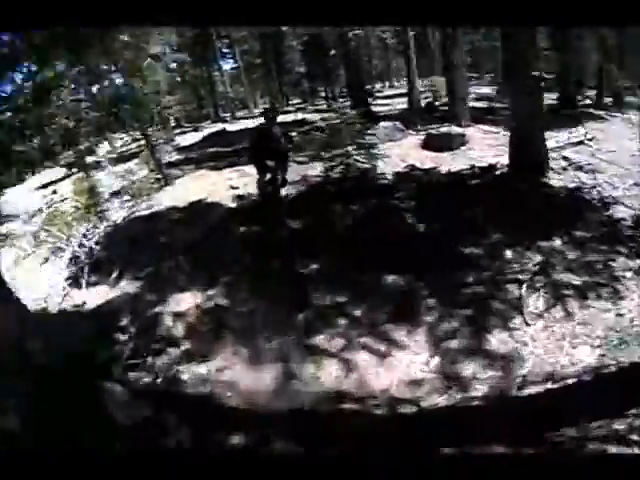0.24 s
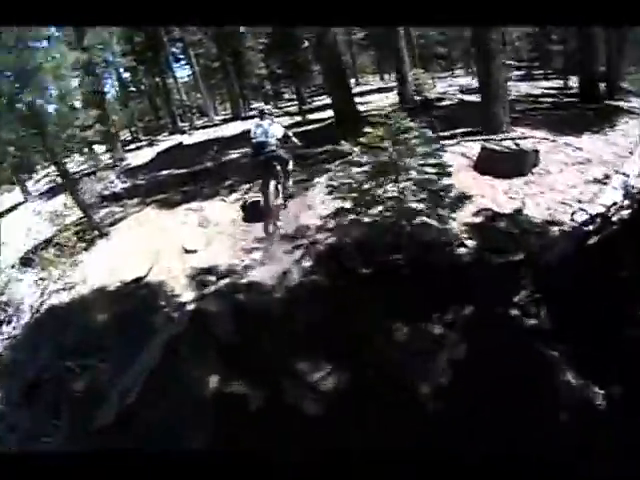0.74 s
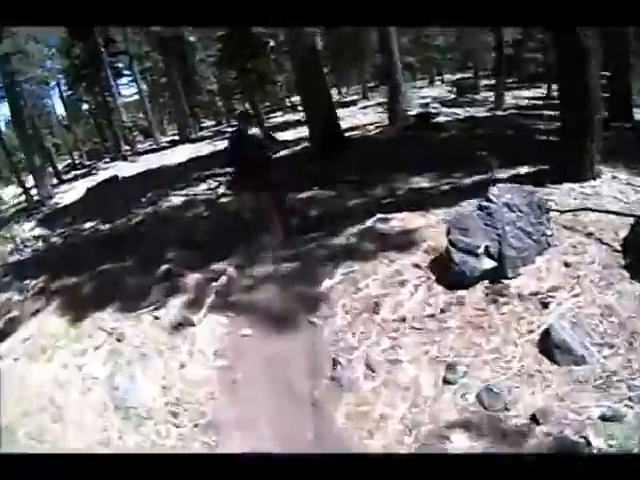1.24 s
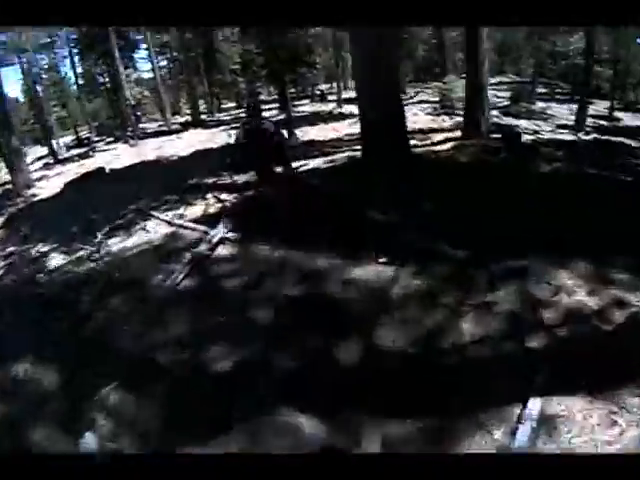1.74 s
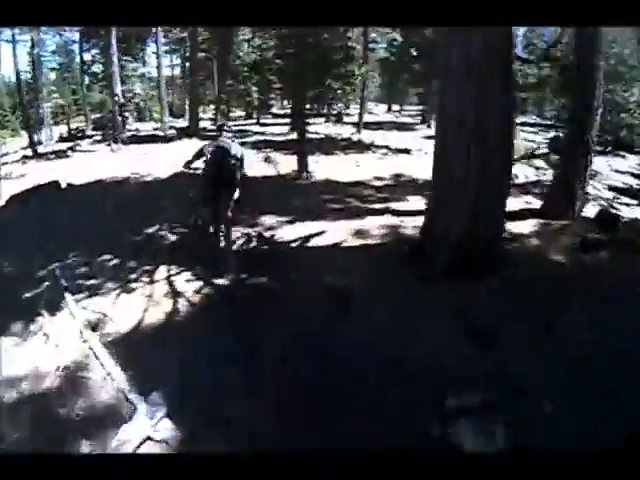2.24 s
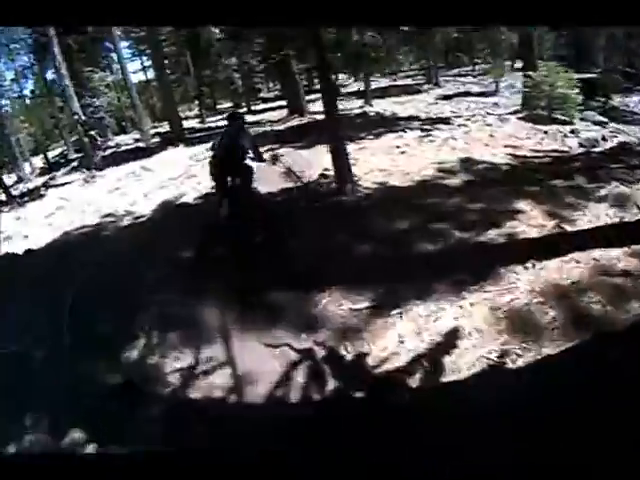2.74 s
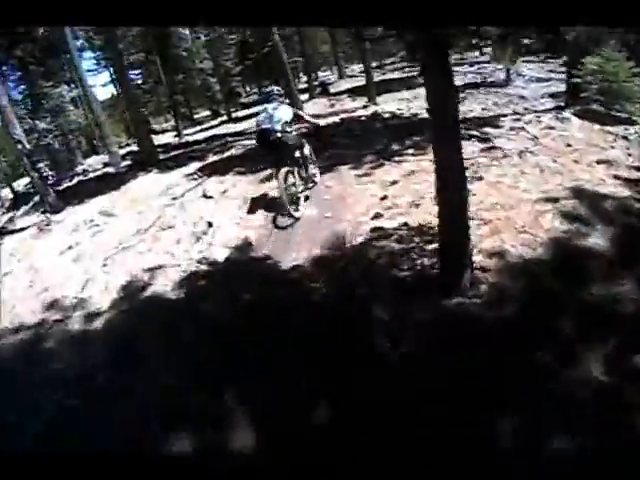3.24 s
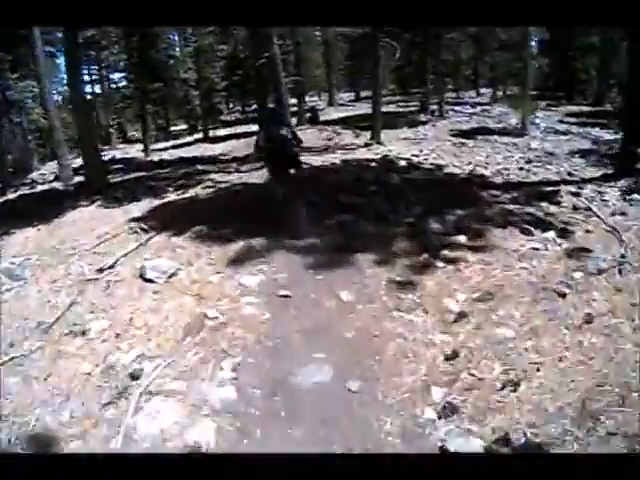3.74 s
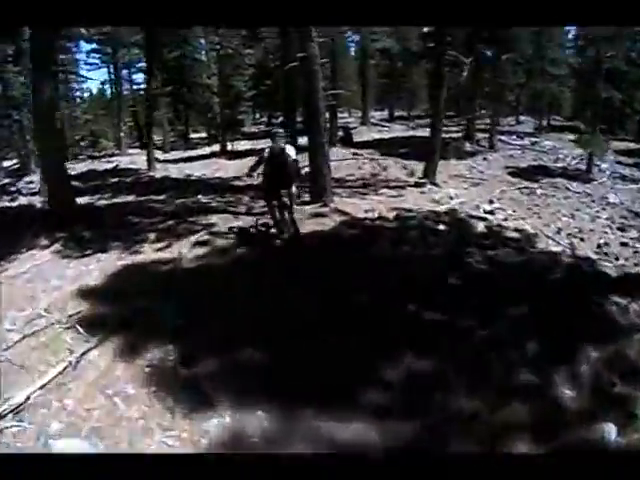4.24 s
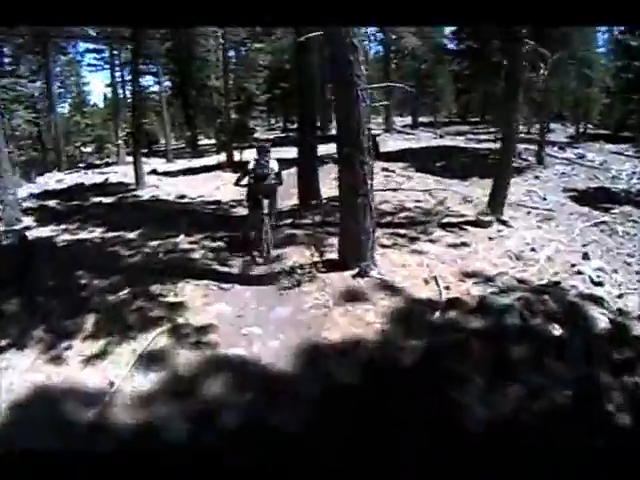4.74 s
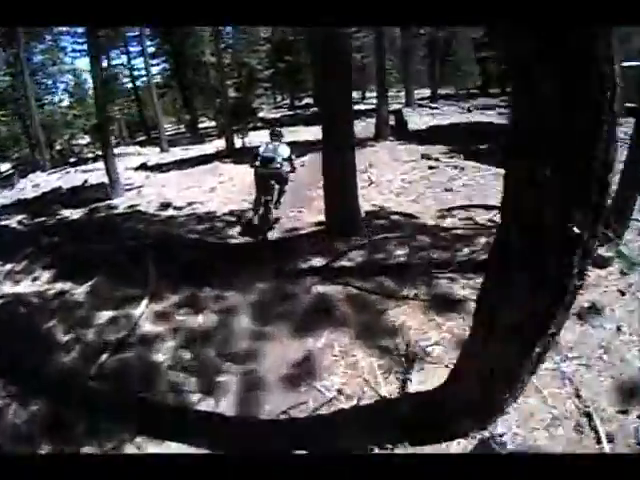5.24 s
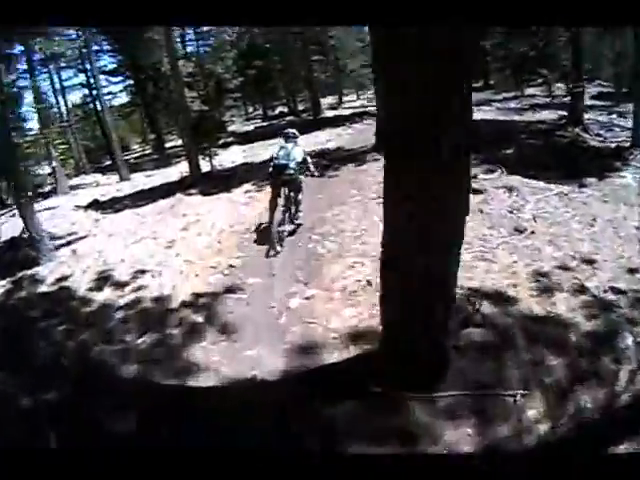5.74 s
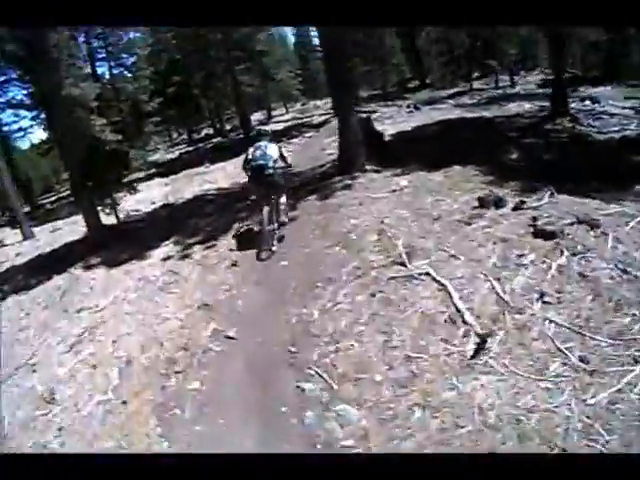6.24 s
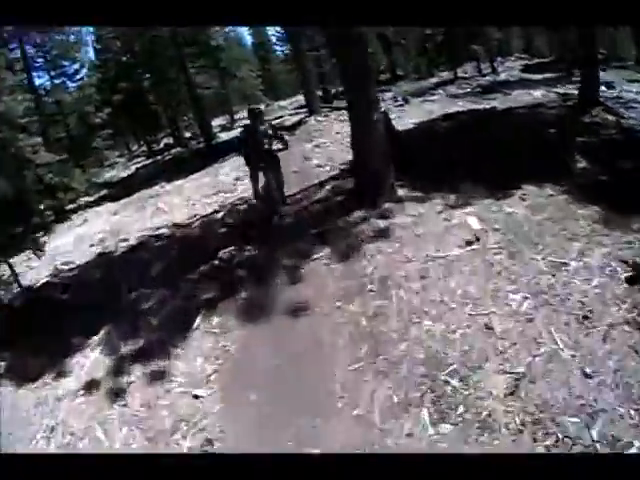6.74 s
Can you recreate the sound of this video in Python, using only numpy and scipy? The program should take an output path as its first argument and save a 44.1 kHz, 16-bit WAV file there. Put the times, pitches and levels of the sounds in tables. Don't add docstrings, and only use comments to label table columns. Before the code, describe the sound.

Gritty tyre crunch, chain slaps and hollow camera-housing clacks on a rough dirt descent, over buffeting headwind and thin hiss.

```python
import sys
import numpy as np
from scipy import signal
from scipy.fft import rfft, irfft, next_fast_len
from scipy.io import wavfile
from scipy.ndimage import uniform_filter1d, map_coordinates

SR = 44100
rng = np.random.default_rng(int(sys.argv[2]) if len(sys.argv) > 2 else 0)


def transcribe(signal):
    frames = np.atleast_2d(signal).T
    limited = np.clip(frames, -1, 1)
    pcm = np.round(limited * 32767).astype(np.int16)
    wavfile.write(sys.argv[1], SR, pcm)


def gain_from_db(level_db):
    decades = np.asarray(level_db, float) / 20
    return 10 ** decades


N = 308700

# (pitch [Hz], width [Hz], level [dB])
PORT_MODES = [(4090, 34, -5), (4550, 790, 12.5), (5250, 790, 1.5)]
# (pitch [Hz], width [Hz], level [dB])
LINK_MODES = [(5940, 210, -8), (8130, 960, -4), (9100, 240, -3), (9150, 15000, -2.5)]
# (time [s], rise over the steady shake [dB], half length [s])
BUMPS = [
    (0.5, 6, 0.24),
    (1.2, 8.5, 0.28),
    (2.175, 16.5, 0.23),
    (2.75, 11, 0.23),
    (4.3, 4.5, 0.32),
    (6.2, 8, 0.77),
]


def unit(x):
    return x / np.sqrt(np.mean(x ** 2) + 1e-20)


def wobble(rate):
    knots = rng.standard_normal(int(N * rate / SR) + 4)
    return map_coordinates(knots, [np.arange(N) * rate / SR])


def curves(rows):
    s, *columns = np.transpose(rows)
    return [np.interp(np.arange(N) / SR, s, column) for column in columns]


def swells(rows):
    t = np.arange(N) / SR
    return sum(db * np.exp(-((t - s) / half) ** 2) for s, db, half in rows)


def filtered(x, response):
    m = next_fast_len(x.shape[-1] + 4096)
    spectrum = rfft(x, m) * response(np.fft.rfftfreq(m, 1 / SR))
    return irfft(spectrum, m)[..., :x.shape[-1]]


def muffled(x, low_hz, high_hz):
    band = signal.butter(4, [low_hz, high_hz], "band", fs=SR, output="sos")
    return signal.sosfilt(band, x)


def colour(points):
    hz, db = np.transpose(points)
    return lambda f: gain_from_db(np.interp(np.log(f + 1), np.log(hz + 1), db))


def modes(table, shift=1, gains=1):
    def response(f):
        rows = []
        for k, (centre, width, db) in enumerate(table):
            sign = (-1) ** k
            damping = 1j * f * width
            rows.append(sign * gain_from_db(db) * damping / ((centre * shift) ** 2 - f * f + damping))
        return np.sum(gains * np.array(rows), axis=0)
    return response


def scatter(count, table, spread_db):
    return gain_from_db(spread_db * rng.standard_normal((count, len(table)))).T[:, :, None]


def rush(patchy_db):
    z = signal.stft(rng.standard_normal(N + 512), nperseg=512)[2]
    field = uniform_filter1d(rng.standard_normal(z.shape), size=4, axis=0)
    field = uniform_filter1d(field, size=8, axis=1)
    return signal.istft(z * gain_from_db(patchy_db * unit(field)), nperseg=512)[1][:N]


def ticks(rate):
    happens = rng.random(N) < rate / SR
    return happens * rng.standard_normal(N) * gain_from_db(1.5 * rng.standard_normal(N))


def strikes(times, peak_db, push, response):
    ring = filtered(push, response)
    ring = ring * (gain_from_db(peak_db) / np.abs(ring).max(axis=1))[:, None]
    at = np.round(times * SR).astype(int)[:, None] + np.arange(ring.shape[1])
    return np.bincount(at.ravel(), ring.ravel(), N + SR)[:N]


def housing_knocks():
    # (time [s], peak [dB], upper wall [dB relative], shell [dB relative], contact [ms])
    hard = [(0.0313, -25, 2, -24, 2.6), (0.6783, -25, -3, -2.5, 1.9), (0.9196, -25, 1.5, -15, 3.8),
            (1.136, -19.5, 3.5, -23, 3.1), (1.2484, -26, -1.5, -8, 5.2), (1.954, -16, 2, -29, 1.65),
            (1.9686, -11, -1, -28, 5), (1.9904, -19, -6, -8, 3), (2.082, -13, -1, -23, 2.8),
            (2.1102, -4.5, 1, -16, 4.3), (2.159, -5.5, -0.5, -23, 1.1), (2.2238, -20, 5.5, -10.5, 2.1),
            (2.8384, -11.5, -2, -26, 2.6), (2.9564, -20, -0.5, -8.5, 6.4), (3.0698, -19.5, 3.5, -11, 3.1),
            (3.228, -22.5, 1.5, -21, 3), (3.579, -22.5, -18, -11, 4.8), (4.5263, -19.5, -7.5, -7.5, 5.1),
            (5.4906, -21, 1, -16, 3.4), (5.876, -23, -1.5, -23, 5.4), (6.083, -19, -5.5, -13, 6.5),
            (6.329, -15, -4, -11.5, 2.5), (6.35, -16, -2, -19, 4.9), (6.5025, -20, 0, -13, 3.9)]
    # (time [s], peak [dB], upper wall [dB relative])
    light = [(0.1787, -26.5, 0), (0.381, -31.5, 2.5), (0.448, -33, 2), (0.587, -29.5, 0.5),
             (0.663, -31.5, 4.5), (0.9926, -37.5, 0), (1.066, -32.5, 1), (1.435, -30.5, 5.5),
             (1.6992, -43, 9.5), (1.837, -33.5, 1), (2.1304, -26, -9), (2.372, -34, 6), (2.434, -33, -1),
             (2.571, -26.5, 2.5), (2.6268, -31, -2), (2.7357, -26, -4), (2.7506, -29, 3), (2.8144, -27, 4),
             (2.973, -23.5, -3), (3.3436, -29.5, -2), (3.866, -30.5, -6), (4.096, -32.5, -2),
             (4.244, -33, -2), (4.2553, -26, 3.5), (5.3448, -25, 0.5), (5.602, -27.5, -2.5),
             (5.8454, -25.5, 1.5), (6.574, -25, 3.5), (6.848, -31, 5.5), (6.86, -27.5, 0)]
    # (time [s], peak [dB])
    dull = [(0.6494, -37), (1.2858, -29.5), (1.383, -30), (1.866, -29.5), (2.1637, -15.5), (2.873, -30),
            (2.94, -36), (4.42, -38), (5.016, -38), (5.643, -31), (5.837, -33), (5.9702, -31), (6.035, -30),
            (6.3091, -42), (6.496, -23.5), (0.467, -32), (0.951, -36), (0.2818, -33), (0.3293, -32.5),
            (0.5008, -33), (0.7058, -34), (1.3376, -33), (1.4092, -34), (1.4885, -36), (2.0223, -34),
            (2.3376, -39), (3.1602, -34.5), (6.2846, -37), (6.4577, -29.5), (6.6653, -33), (6.7446, -33),
            (6.783, -32), (0.852, -37), (1.984, -33), (2.0937, -24.5), (2.1048, -17)]
    # (pitch [Hz], width [Hz], level [dB])
    low_wall = [(1163, 170, -6), (1359, 210, 4), (1465, 146, 4), (1640, 61, -2)]
    high_wall = [(1947, 67, -7.5), (2237, 127, 1), (2612, 108, -3.5), (3130, 99, -16.5)]
    shell_modes = [(712, 320, -3.5), (855, 110, -8.5), (960, 53, 1.5)]
    clack_db, port_leak_db = -5.5, -18.5
    seat_s, blow = 0.0006, 1.59

    taps = [(*row, -20, 3.9) for row in light]
    nudges = [(*row, -8.5, -13, 4.1) for row in dull]
    s, db, upper_db, shell_db, contact_ms = np.transpose([*hard, *taps, *nudges])
    count = len(s)
    t = np.arange(2048) / SR
    fade = np.exp(-2 * t / (contact_ms / 1000)[:, None])
    chatter = rng.standard_normal((count, len(t))) * fade * (1 - np.exp(-t / seat_s))
    bare = chatter + blow * np.exp(-t / 0.00015)
    push = muffled(bare, low_hz=675, high_hz=3130)

    wall_hz = 1457 * (1 + 0.058 * rng.standard_normal(count))
    shift = (wall_hz[:, None] / 1400) ** 0.5
    low_response = modes(low_wall, shift, scatter(count, low_wall, spread_db=1.5))
    high_response = modes(high_wall, shift ** 0.036, scatter(count, high_wall, spread_db=0.0))
    shell_response = modes(shell_modes, shift ** 0.05, scatter(count, shell_modes, spread_db=4))
    low = strikes(s, db, push, low_response)
    high = strikes(s, db + upper_db, push, high_response)
    shell = strikes(s, db + shell_db + 0.5, push, shell_response)

    contact_db = db + np.minimum(upper_db, 0)
    clack = strikes(s, contact_db + clack_db, muffled(push, low_hz=1105, high_hz=3300), lambda f: 1)
    leak_push = muffled(bare, low_hz=2700, high_hz=5600)
    leak = strikes(s, contact_db + port_leak_db, leak_push, modes(PORT_MODES))
    return low + high + shell + clack + leak


def chain_hits(table, rise, tick):
    s, db, t60, bright_db = np.transpose(table)
    count = len(s)
    t = np.arange(6144) / SR
    swell = (1 - np.exp(-(t + 1 / SR) / rise)) ** 2
    jingle = rng.standard_normal((count, len(t))) ** 3 * gain_from_db(-60 * t / t60[:, None]) / 3
    first_blow = tick * gain_from_db(-60 * t / 0.0036) * rng.standard_normal((count, len(t)))
    push = swell * (jingle + first_blow)

    hz = 4640 * (1 + 0.041 * rng.standard_normal(count))
    shift = (hz[:, None] / 4650) ** 0.63
    body_response = modes(PORT_MODES, shift, scatter(count, PORT_MODES, spread_db=3.0))
    link_response = modes(LINK_MODES, shift ** 0.043, scatter(count, LINK_MODES, spread_db=4.0))
    body = strikes(s - rise, db, muffled(push, low_hz=3160, high_hz=6070), body_response)
    bright_push = muffled(push, low_hz=4550, high_hz=10200)
    return body + strikes(s - rise, db + bright_db - 1, bright_push, link_response)


def chain():
    # (time [s], peak [dB], time to fade 60 dB [s])
    padded = [(0.6634, -33, 0.05), (0.8165, -35, 0.1), (1.735, -33, 0.027), (1.826, -30.5, 0.062),
              (1.9908, -28, 0.033), (1.972, -34, 0.035), (1.956, -34, 0.03), (2.1095, -23.5, 0.03),
              (2.159, -23, 0.016), (2.8388, -30, 0.047), (4.2536, -28, 0.022), (5.0764, -31.5, 0.038),
              (5.479, -30.5, 0.05), (5.697, -35, 0.037), (6.135, -31.5, 0.037), (6.3414, -32, 0.048),
              (6.5986, -29, 0.034), (6.7022, -26.5, 0.029), (6.8498, -28.5, 0.022), (1.46, -39, 0.03),
              (2.5242, -37, 0.04), (2.5621, -34, 0.04), (4.467, -38, 0.02), (4.66, -35, 0.02),
              (5.1622, -36, 0.03), (5.8585, -32, 0.03), (1.03, -39, 0.05), (1.08, -35, 0.04),
              (4.345, -33.5, 0.05)]
    # (time [s], peak [dB], time to fade 60 dB [s], bright links [dB relative])
    metal = [(0.606, -36, 0.092, -17.5), (1.2356, -27.5, 0.046, -17), (2.1264, -27, 0.078, -16),
             (2.3665, -15.5, 0.07, -14.5), (2.4643, -24, 0.056, -14), (2.8729, -29, 0.044, -13),
             (2.891, -23, 0.05, -13), (2.9365, -24.5, 0.21, -13), (3.1218, -33, 0.058, -17),
             (3.2678, -29.5, 0.12, -15), (3.3089, -30.5, 0.037, -16), (3.697, -26, 0.034, -7),
             (3.7154, -37, 0.056, -17), (3.8647, -25, 0.02, -13.5), (4.1617, -35, 0.055, -5),
             (4.1714, -38, 0.03, -1), (4.9585, -29, 0.028, -18), (5.596, -35, 0.037, -13),
             (5.662, -35, 0.037, -17)]
    # (time [s], peak [dB], time to fade 60 dB [s])
    loose = [(0.333, -34, 0.039), (0.4932, -28, 0.073), (0.5458, -25, 0.096), (0.6868, -33.5, 0.06),
             (1.187, -32, 0.043), (1.361, -19, 0.044), (1.421, -24, 0.032), (1.6675, -29.5, 0.033),
             (2.2617, -32.5, 0.14), (2.472, -25, 0.041), (2.608, -28, 0.17), (2.6774, -26.5, 0.073),
             (2.947, -27.5, 0.058), (3.056, -32, 0.077), (3.203, -28.5, 0.041), (3.804, -33.5, 0.037),
             (4.426, -34, 0.05), (5.454, -32.5, 0.04), (5.742, -32.5, 0.065), (5.7744, -35, 0.054),
             (6.5265, -26.5, 0.054), (6.6617, -29.5, 0.072), (0.94, -32.5, 0.059), (1.905, -32, 0.07),
             (2.015, -32, 0.1), (6.148, -38, 0.031), (6.166, -32.5, 0.12), (6.22, -33, 0.092),
             (6.368, -31, 0.087), (6.752, -31, 0.06)]
    slaps = [(*row, -22) for row in padded] + [*metal]
    jingles = [(*row, -15) for row in loose]
    return chain_hits(slaps, rise=0.0008, tick=0.64) + chain_hits(jingles, rise=0.0049, tick=0.3)


def frame_snaps():
    # (time [s], peak [dB], centre [Hz], time to fade 60 dB [s])
    clicks = [(4.2548, -27, 3300, .016), (3.8655, -28, 3500, .012), (4.9585, -30, 3100, 0.015),
              (5.02, -35, 3000, .012), (2.3665, -18.5, 4200, 0.013), (2.4643, -29, 3400, .014),
              (2.16, -15, 2600, 0.013), (1.4356, -27, 2300, .014), (4.467, -38, 3600, .01),
              (3.5, -29, 3300, .012), (5.837, -32, 3500, .012), (6.5, -35, 4000, .012),
              (6.003, -37, 5200, .012), (2.7, -28, 3400, .012), (2.4, -29, 5400, .012)]
    s, db, hz, t60 = np.transpose(clicks)
    t = np.arange(1024) / SR
    burst = rng.standard_normal((len(s), len(t))) * gain_from_db(-60 * t / t60[:, None])
    centre = hz[:, None]
    width = 2 * 0.39 * centre

    def band(f):
        damping = 1j * f * width
        return (damping / (centre ** 2 - f * f + damping)) ** 2
    return strikes(s, db, burst, band)


def tyres():
    # (time [s], roughness [dB], loose gravel over firm dirt [dB])
    trail = [(0.0, 1.5, -7), (0.3, -1.5, 0), (0.62, 3, -3.5), (0.95, -3.5, -2.5), (1.25, 4.5, -0.5),
             (1.44, 3.5, 0), (1.66, -3, 4.5), (1.85, -1, 5), (2.02, 7.5, -4.5), (2.42, 0, 3),
             (2.75, 3.5, 0), (3.1, -0.5, 2), (3.55, -4, -4), (3.75, -3, 1.5), (4.7, -2, -4),
             (5.1, -3.5, 0.5), (6.4, 2.5, -3), (7.0, 0, 0)]
    # (pitch [Hz], width [Hz], level [dB])
    cavity = [(984, 410, -11), (1200, 300, -4.5), (1500, 213, -2), (1910, 300, -6), (2240, 284, -4.5),
              (2640, 157, -6), (3180, 650, -15)]
    # (pitch [Hz], width [Hz], level [dB])
    mount_note = [(1538, 140, 0)]
    # (pitch [Hz], width [Hz], level [dB])
    grit_port = [(4035, 560, 7), (4686, 580, 17.5), (5250, 450, 4)]
    # (time [s], rise over the crunch [dB], half length [s])
    rubs = [
        (2.03, -2.5, 0.031),
        (2.145, 7.5, .02),
        (2.19, 3, 0.032),
        (4.43, 4, 0.019),
        (4.49, 0.5, 0.056),
        (6.15, 1, 0.037),
    ]
    # (time [s], rise [dB], half length [s])
    hum_rises = [(4.43, 7, .025), (4.485, 7, .03), (4.6, 3, .04), (4.72, 1.5, .05), (0.715, 5.5, .02),
                 (0.84, 5, .03), (1.19, 5, .03), (1.41, 4, 0.028), (2.0, 9, .01), (5.72, 3, 0.037),
                 (5.98, 6, 0.033), (6.04, 6, .02)]
    crunch_db, grit_db, hum_db = -48, -50.5, -3.5

    rough_db, loose_db = curves(trail)
    bumps = wobble(25)
    stones = (rush(0.78) + 0.5 * unit(ticks(1500))) * gain_from_db(1.2 * bumps + 2.8 * wobble(80))
    crunch = unit(filtered(muffled(stones, low_hz=590, high_hz=3580), modes(cavity)))
    hum = unit(filtered(rush(1.2) * gain_from_db(2.5 * wobble(45)), modes(mount_note)))
    crunch = crunch + gain_from_db(hum_db + swells(hum_rises)) * hum

    grit_surge = gain_from_db(0.9 * bumps + 2.4 * wobble(90) + 1.3 * wobble(20))
    grains = (0.7 * rush(2.2) + unit(ticks(450))) * grit_surge
    grains = muffled(grains, low_hz=2580, high_hz=8800)
    grit = unit(filtered(grains, lambda f: modes(grit_port)(f) + gain_from_db(-8.5) * modes(LINK_MODES)(f)))
    return gain_from_db(rough_db) * (gain_from_db(crunch_db + swells(rubs)) * crunch + gain_from_db(grit_db + loose_db) * grit)


def headwind():
    # (time [s], strength [dB], rasp [dB relative])
    gusts = [(0.0, -43.5, 3), (0.27, -41, 1.5), (1.09, -49.5, 4.5), (1.6, -46, 0), (1.87, -47, -7),
             (2.3, -45.5, -4), (2.81, -44, 3.5), (3.0, -49, 0.5), (3.51, -43, 0), (3.8, -46, -5),
             (4.11, -43, 0), (4.4, -47.5, 4), (4.76, -50.5, -4), (5.32, -43, 2), (5.52, -46, -3),
             (5.75, -40, 2), (6.12, -45, 4), (6.9, -40.5, 4.5)]
    # (time of return [s], length [s], depth [dB])
    lulls = [
        (2.26, .25, 6.5),
        (4.307, 0.19, 7.5),
        (4.387, 0.05, 15),
        (4.613, 0.21, 15.5),
        (5.027, 0.22, 9.5),
        (5.486, 0.081, 6.5),
        (5.852, 0.11, 9.5),
    ]
    # (frequency [Hz], level [dB])
    roar_colour = [(120, -15.5), (200, -4), (330, 4.5), (480, 0), (650, -7.5), (860, -12.5), (1100, -13.5),
                   (1430, -14), (2420, -120)]
    buffet_colour = [(41, -32), (70, -3.5), (230, 0), (300, -5), (510, -120)]
    rasp_colour = [(300, -32), (420, -3.5), (520, -0.5), (700, -2), (950, -10.5), (1400, -22), (2400, -120)]
    sag, snap_s = 0.34, 0.017

    t = np.arange(N) / SR
    lulls_db = 0
    for s, long, db in lulls:
        corners = [s - long, s - long * (1 - sag), s, s + snap_s]
        lulls_db = lulls_db + np.interp(t, corners, [0, db, db, 0])
    gust_db, rasp_db = curves(gusts)
    roar_db = gust_db - lulls_db
    flutter = gain_from_db(0.84 * wobble(6.0) + 1.0 * wobble(35))
    roar = unit(flutter * filtered(rush(0.97), colour(roar_colour)))
    buffet = unit(flutter * filtered(rush(2.0), colour(buffet_colour)))
    rasp = unit(flutter * gain_from_db(1.3 * wobble(30)) * filtered(rush(1.4), colour(rasp_colour)))

    rasp_db = -8.5 + rasp_db + (1 - 0.7) * lulls_db
    buffet_db = -50 + 0.5 * (roar_db + 45) + 0.21 * swells(BUMPS)
    return gain_from_db(roar_db) * (roar + gain_from_db(rasp_db) * rasp) + gain_from_db(buffet_db) * buffet


def frame():
    # (time [s], level [dB], pitch [Hz], time to fade 60 dB [s], rise [s])
    ringing_parts = [(2.03, -39, 42, .2, .012), (2.16, -34, 59, .55, .012), (3.577, -23, 1060, .03, .001),
                     (5.4455, -9, 1480, .028, .007), (1.361, -39, 6450, .05, .003),
                     (2.371, -38, 6430, .12, .004), (2.892, -39, 6430, .07, .003),
                     (5.596, -48, 6450, .06, .002), (1.361, -33, 4100, .04, .004),
                     (1.991, -25, 3200, .012, .0005), (4.527, -33, 965, .045, .002),
                     (3.865, -31, 2700, .018, .0005)]
    # (frequency [Hz], level [dB])
    shake_colour = [(8.8, -29), (15, 9.5), (38, 0), (75, -9), (98, -44), (160, -120)]
    sound = gain_from_db(-61 + swells(BUMPS)) * unit(filtered(rush(1.0), colour(shake_colour)))
    for s, db, hz, t60, rise in ringing_parts:
        t = np.clip(np.arange(N) / SR - s, 0, None)
        envelope = gain_from_db(db - 60 * t / t60) * (1 - np.exp(-t / rise))
        sound = sound + envelope * np.sin(2 * np.pi * hz * t)
    return sound


def camera_noise():
    # (frequency [Hz], level [dB])
    hiss_colour = [(1650, -52), (2800, -7), (4660, -3.5), (6460, -10.5), (12300, -12), (15100, -10),
                   (15900, -27)]
    # (pitch [Hz], level [dB rms])
    tones = [(10204, -82), (10243, -78), (10282, -80), (15074, -66), (15105, -82)]
    t = np.arange(N) / SR
    hiss = gain_from_db(-52) * unit(filtered(rng.standard_normal(N), colour(hiss_colour)))
    waver = gain_from_db(0.7 * wobble(9) + 1.8 * wobble(90))
    whistles = sum(np.sqrt(2) * gain_from_db(db) * np.sin(2 * np.pi * hz * t) for hz, db in tones)
    return hiss + waver * whistles


def scene():
    bike = housing_knocks() + chain() + frame_snaps() + tyres() + frame()
    return (bike + headwind() + camera_noise())[None]


def top_cut(x):
    return signal.sosfilt(signal.butter(12, 16870, fs=SR, output="sos"), x)


def record(dry):
    ceiling = 1.25
    held = dry / (1 + np.abs(dry / ceiling) ** 4) ** (1 / 4)
    mix = filtered(held, lambda f: f < 15950)
    return top_cut(mix)


dry = scene()
out = record(dry)
transcribe(out)
```